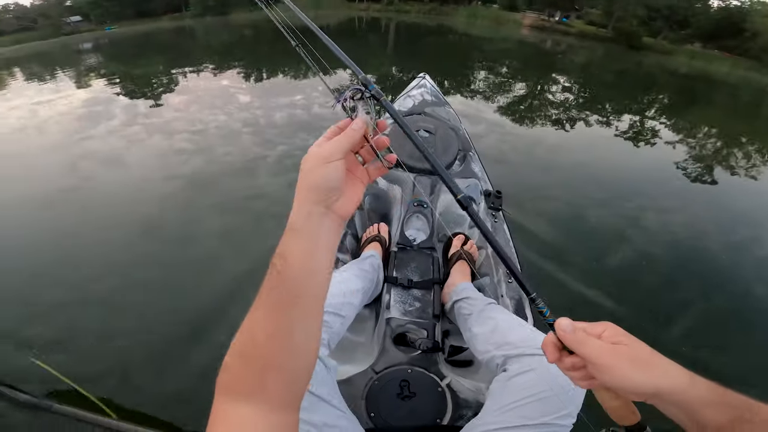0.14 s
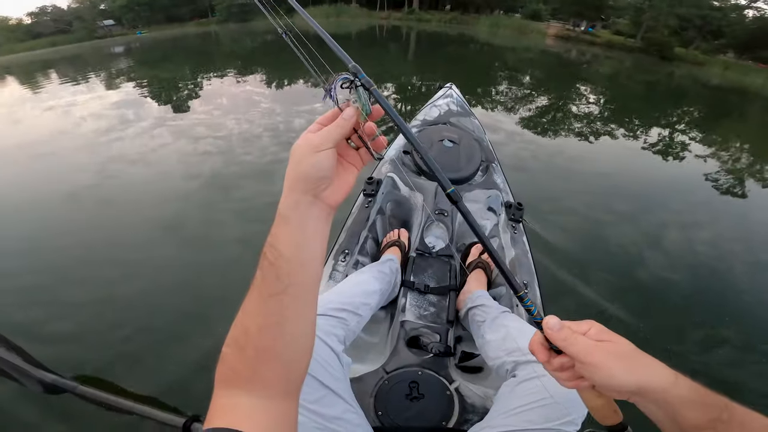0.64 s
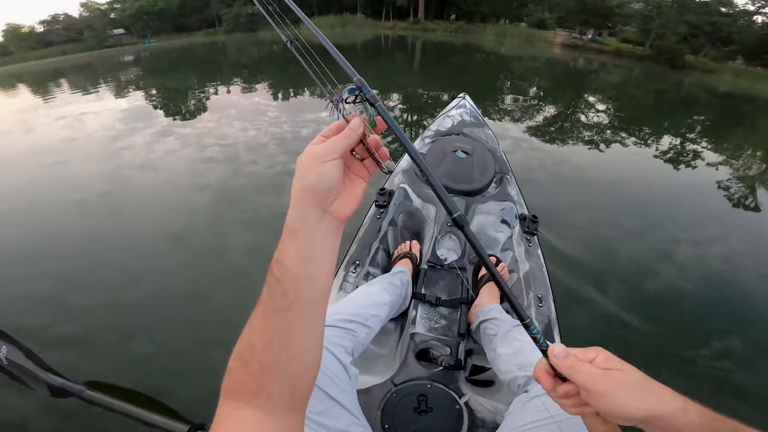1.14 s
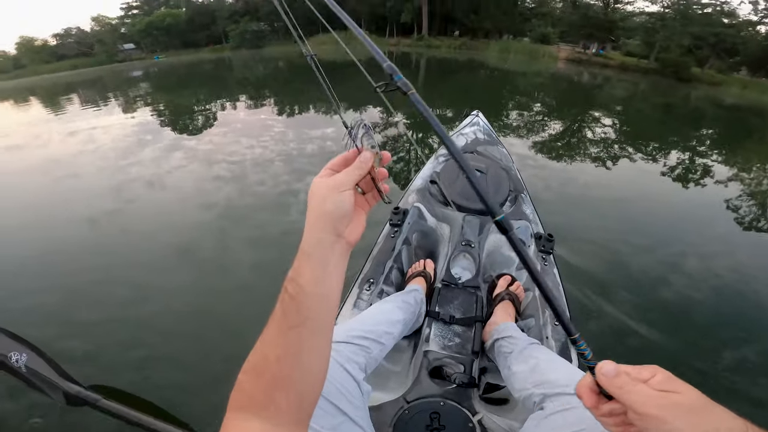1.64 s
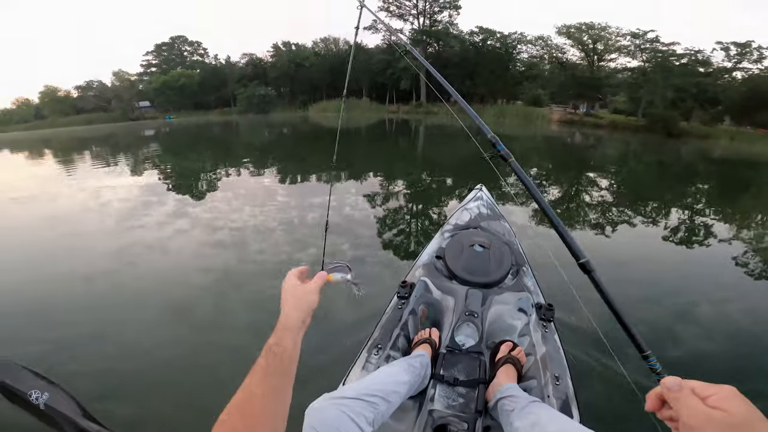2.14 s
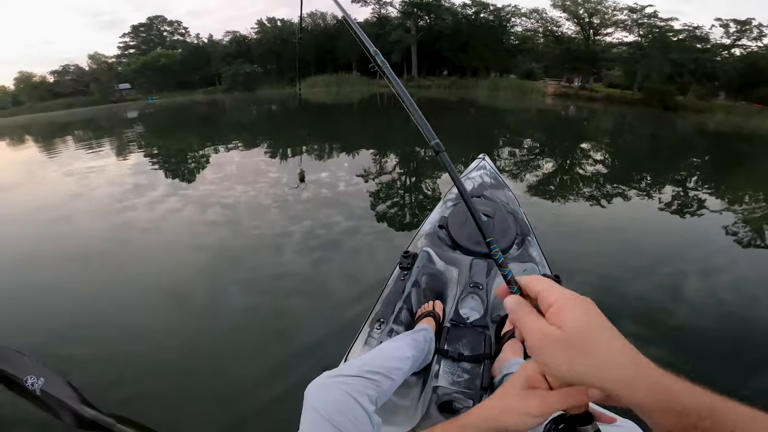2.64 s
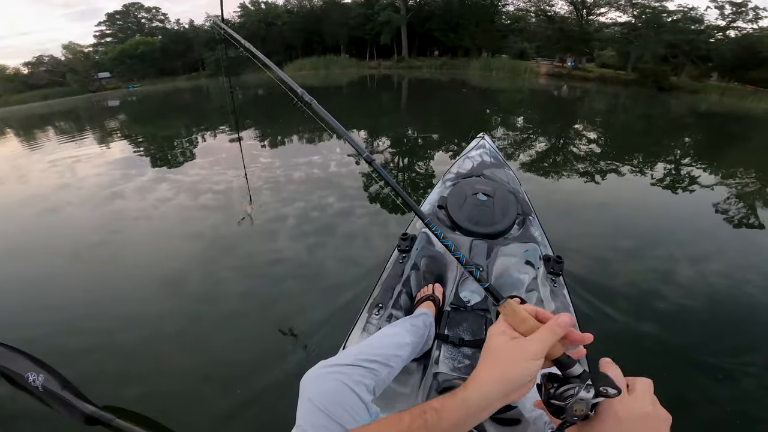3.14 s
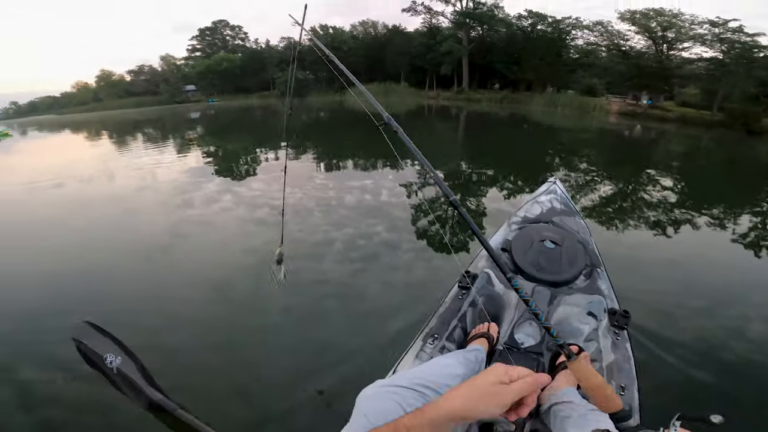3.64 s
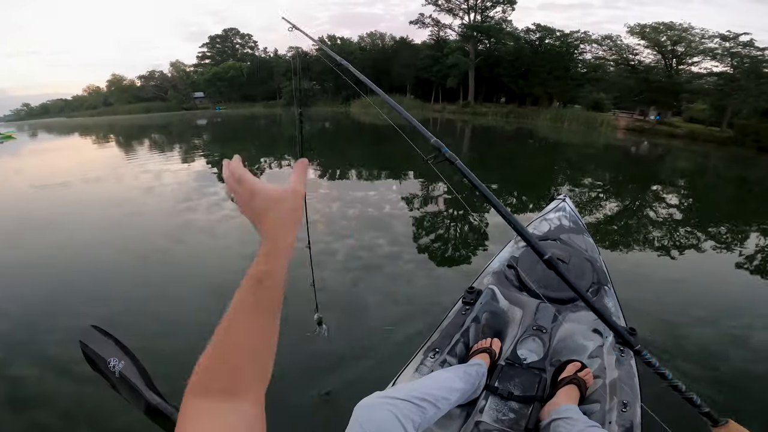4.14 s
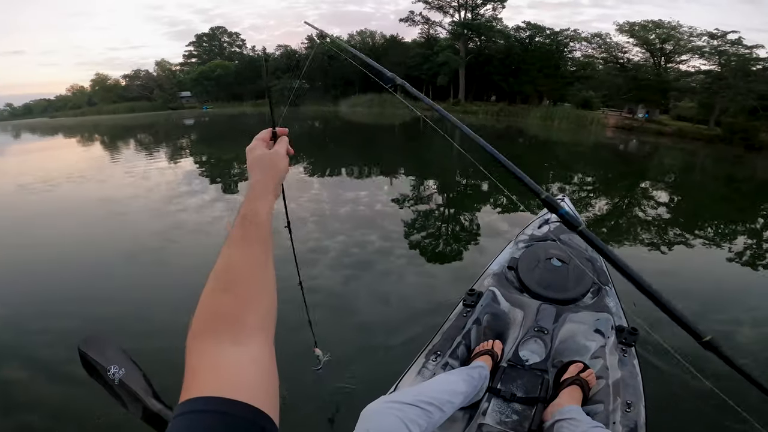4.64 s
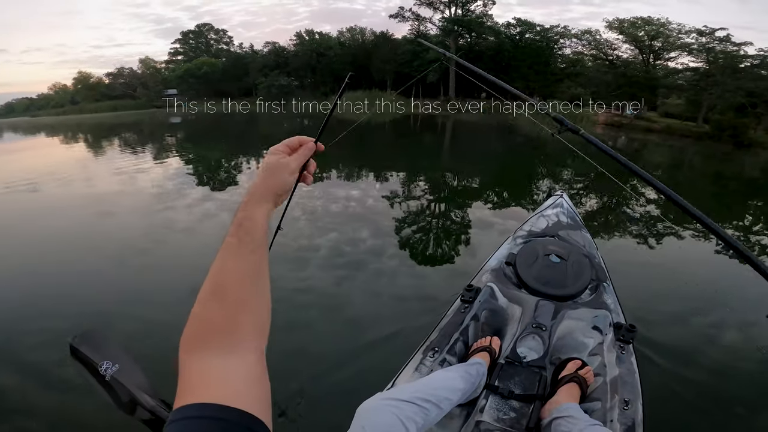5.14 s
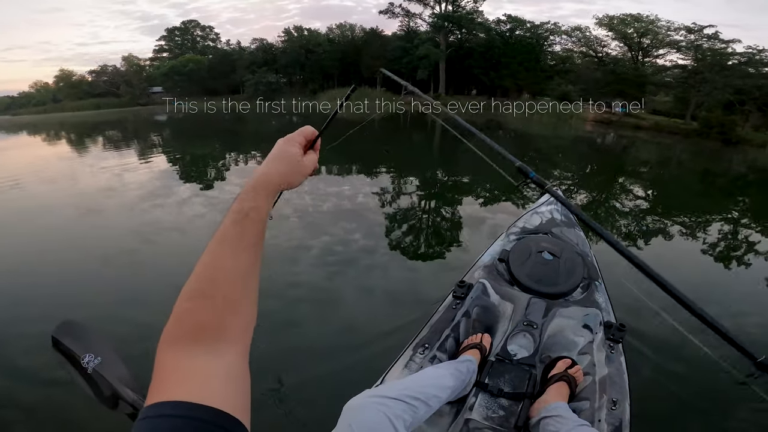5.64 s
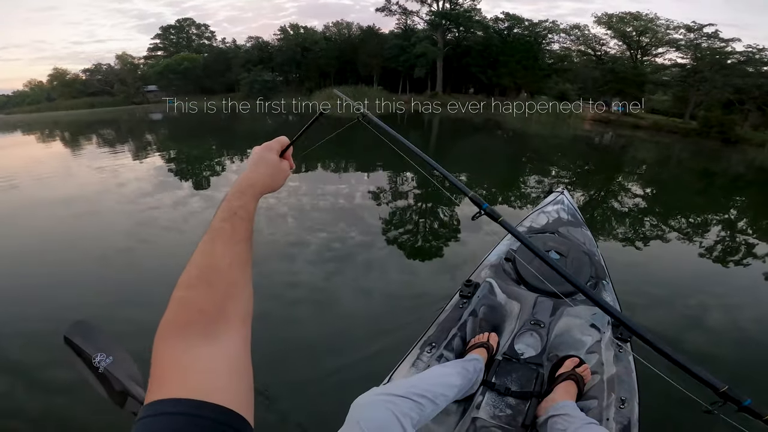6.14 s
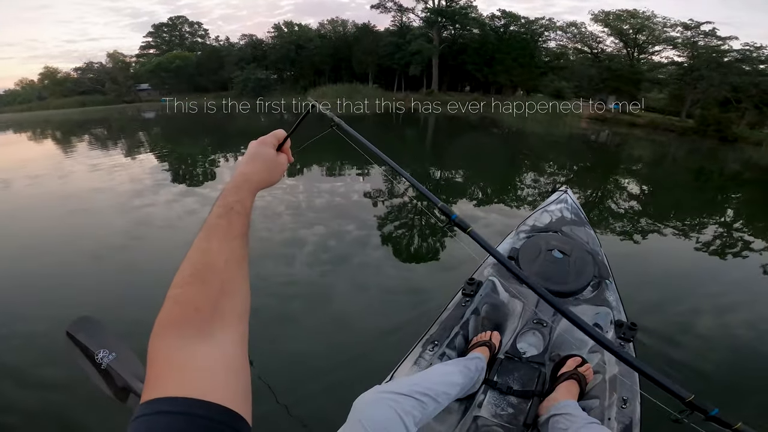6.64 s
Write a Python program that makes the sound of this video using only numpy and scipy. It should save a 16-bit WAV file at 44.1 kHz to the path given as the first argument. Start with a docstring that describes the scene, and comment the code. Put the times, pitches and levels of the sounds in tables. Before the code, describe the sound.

On a still lake at dawn, a soft bassy air bed and a short water swish open the scene. Thin bird chirps echo from the bank. Close to the microphone, hooks and plastic parts click lightly, then rattle sharply in a dense run between about two and three and a half seconds. Birds take over, with one hard snap and small ticks near the end.

```python
"""Fishing tackle at dawn

Dawn on a still lake, heard from a small boat: a hand frees a lure and works a fishing reel.
Hooks and plastic parts click and rattle close by: rough bursts of noise that set small modes ringing.
Birds in the bank trees are gliding sines with noise echoes; an insect is noise pulsed by wing strokes.
Rustles, one water swish at the start, air and a faint whine are shaped noise; a far hum is two low tones."""
import sys
import numpy as np
from scipy import signal
from scipy.fft import rfft, irfft
from scipy.io import wavfile

SR = 44100
rng = np.random.default_rng(int(sys.argv[2]) if len(sys.argv) > 2 else 0)


def volts_from_decibels(level):
    """Turn decibel levels (scalar or array-like) into linear amplitude factors."""
    exponent = np.asarray(level, float) / 20
    return 10 ** exponent


def log_audio(samples):
    """Write samples as a 16-bit WAV file to the path given in sys.argv[1]."""
    # one column per channel
    frames = np.atleast_2d(samples).T
    # limit to full scale, then quantise
    limited = np.clip(frames, -1, 1)
    pcm = np.round(limited * 32767).astype(np.int16)
    wavfile.write(sys.argv[1], SR, pcm)


N = 299439  # length of the scene in samples


def rms_one(x):
    """Scale a sound to rms 1."""
    return x / np.sqrt(np.mean(x ** 2) + 1e-20)


def in_time(rows):
    """Draw straight lines between the rows of a table: one value per sample for each column."""
    s, *columns = np.transpose(rows)
    return [np.interp(np.arange(N) / SR, s, column) for column in columns]


def drift(rate_hz):
    """A smooth random wander of spread 1, made from low-passed noise."""
    step = 40  # worked out at every 40th sample, then joined by lines
    r = np.exp(-2 * step * np.pi * rate_hz / SR)
    slow = signal.lfilter([1], [1, -2 * r, r * r], rng.standard_normal(N // step + 2002))
    slow = slow[2000:]  # skip the filter's start
    slow = rms_one(slow - slow.mean())
    return np.interp(np.arange(N) / step, np.arange(len(slow)), slow)


def band(x, low_hz, high_hz):
    """Butterworth band-pass: keep what lies between two frequencies."""
    edges = [low_hz, min(high_hz, .45 * SR)]
    return signal.sosfilt(signal.butter(2, edges, "band", fs=SR, output="sos"), x)


def around(x, centre_hz, width_hz):
    """Band-pass twice around a centre, for steeper sides."""
    edges = centre_hz - width_hz / 2, centre_hz + width_hz / 2
    return band(band(x, *edges), *edges)


def coloured(spectrum, patchy_db):
    """Noise shaped by a spectrum; each half octave flickers by itself; about rms 1."""
    hz = np.maximum(np.fft.rfftfreq(N, 1 / SR), 1)
    table = np.array(spectrum)
    shape_db = np.interp(np.log(hz), np.log(table[:, 0]), table[:, 1])
    shaped = rfft(rng.standard_normal(N)) * volts_from_decibels(shape_db)
    half_octave = 2 * np.log2(hz / 20)
    total = np.zeros(N)
    for k in range(21):
        part = irfft(shaped * np.clip(1 - abs(half_octave - k), 0, 1), N)
        total += part * volts_from_decibels(patchy_db * drift(8.0))
    return rms_one(total)


def add(out, s, sound):
    """Mix a short sound in at time s."""
    i = round(s * SR)
    out[i:i + len(sound)] += sound[:N - i]


def parabola(u, first, middle, last):
    """A smooth curve through three values, for u from -1 to 1."""
    return middle + (last - first) / 2 * u + ((first + last) / 2 - middle) * u ** 2


def puffs(rows, grain_db):
    """Soft-edged bursts of band noise, the grainier the larger grain_db."""
    out = np.zeros(N)
    for s, length, hz, width_hz, db in rows:
        u = np.linspace(-1, 1, int(length * SR))
        noise = rng.standard_normal(len(u)) * volts_from_decibels(grain_db * drift(150.0)[:len(u)])
        add(out, s, volts_from_decibels(db) * np.sqrt(1 - u ** 2) * rms_one(around(noise, hz, width_hz)))
    return out


# colour of air, far traffic and microphone hiss: (frequency [Hz], relative level per Hz [dB])
AIR_COLOUR = [(20, -4), (86, 2.5), (388, -2), (718, -6), (1030, -12.5), (1600, -20.5), (2600, -25.5),
              (4180, -29.5), (6360, -30), (11800, -41), (12200, -70)]
# loudness of that noise: (time [s], level [dB])
AIR_LOUDNESS = [(0.0, -61), (0.34, -61), (6.79, -62.5)]


def air():
    """Air, far traffic and microphone hiss together: one steady noise, strongest in the bass."""
    return volts_from_decibels(in_time(AIR_LOUDNESS)[0]) * coloured(AIR_COLOUR, patchy_db=0.3)


# far hum, before its wavering: (time [s], lower tone level [dB], upper tone level [dB])
HUM_LEVELS = [(0, -81, -65), (.6, -72.5, -73), (1.0, -63.5, -69.5), (1.5, -76, -63), (2.3, -71.5, -75.5),
              (3.299, -79.5, -80.5), (5.8, -81.5, -82), (6.5, -77, -70.5)]


def hum():
    """Two low tones about an octave apart, wavering in pitch and loudness."""
    out = np.zeros(N)
    for hz, db in zip((129, 258.3), in_time(HUM_LEVELS)):
        wavering_hz = hz * (1 + 0.0067 * drift(3.0))
        tone = np.sqrt(2) * np.sin(2 * np.pi * np.cumsum(wavering_hz) / SR)  # rms 1
        out += volts_from_decibels(db + 1.6 * drift(3.4)) * tone
    return out


def whine():
    """A faint narrow band of noise that swells and sinks slowly."""
    centre_hz, width_hz, level_db = 1960, 200, -84
    narrow = band(rng.standard_normal(N), centre_hz - width_hz / 2, centre_hz + width_hz / 2)
    return volts_from_decibels(level_db + 1.3 * drift(.5)) * rms_one(narrow)


# colour of the water swish: (frequency [Hz], relative level per Hz [dB])
SWISH_COLOUR = [(300, -2.5), (800, 9), (1400, -12), (2200, -6.5), (3200, -12), (4700, 5), (5600, -13),
                (9000, -31.5)]


def swish():
    """Water swishes once at the start: patchy noise that holds briefly, then dies away."""
    level_db, hold_s, fade_db_per_s = -61.5, 0.19, 64
    fading_s = np.maximum(np.arange(N) / SR - hold_s, 0)
    return volts_from_decibels(level_db - fade_db_per_s * fading_s) * coloured(SWISH_COLOUR, patchy_db=4.0)


def insect():
    """Steady wing strokes, each a short rasp into one broad resonance."""
    strokes_per_s, level_db = 74.2, -83.5
    stroke = np.cumsum(strokes_per_s * (1 + .006 * drift(1.5))) / SR
    gate = .25 + (.5 + .5 * np.cos(2 * np.pi * stroke)) ** 2
    rasp = around(rng.standard_normal(N) * gate, centre_hz=5720, width_hz=850)
    return volts_from_decibels(level_db + 1.2 * drift(.6)) * rms_one(rasp)


def whistle(length, first_hz, middle_hz, last_hz, db):
    """A sine gliding along a parabola through three pitches, with soft ends."""
    u = np.linspace(-1, 1, int(length * SR))
    hz = parabola(u, first_hz, middle_hz, last_hz)
    return volts_from_decibels(db) * np.sqrt(2) * (1 - u ** 2) ** 0.5 * np.sin(2 * np.pi * np.cumsum(hz) / SR)


def trees(x, t60):
    """Scattered echoes from bank and foliage: a noise tail that falls by 60 dB in t60 seconds."""
    t = np.arange(int(t60 * SR)) / SR
    tail = rng.standard_normal(len(t)) * volts_from_decibels(-60 * t / t60) * np.minimum(t / 0.011, 1)
    return signal.fftconvolve(x, tail / np.sqrt(np.sum(tail ** 2)))[:N]


def chorus():
    """Many faint chirps from farther trees, at random, more of them later on."""
    out = np.zeros(N)
    for when, length, pitch, bend, slide, level in rng.random((210, 6)):
        hz = 1800 + 2200 * pitch ** 1.5
        glide = hz * (1.07 - .14 * slide), hz * (1 + .06 * bend), hz * (.93 + .14 * slide)
        note = whistle(.015 + .035 * length, *glide, -87 + 8 * level)
        add(out, when ** .5 * (N / SR - .1), note)
    return out


def series():
    """Seven syllables sinking in pitch, each an upward flick into a held tone; the flicks grow quickly at first."""
    start_s, beat_s, top_hz, sag_hz_per_s = 1.788, .0843, 7000, 980
    held_db, flick_limit_db, flick_growth_db = -72, -69.5, 18
    out = np.zeros(N)
    for k in range(7):
        s = start_s + k * beat_s
        hz = top_hz - sag_hz_per_s * k * beat_s
        flick_db = flick_limit_db - flick_growth_db * 0.55 ** k
        add(out, s, whistle(.016, .74 * hz, .87 * hz, .95 * hz, flick_db))
        add(out, s + 0.012, whistle(0.076, .97 * hz, hz, .985 * hz, held_db))
    return out


def cascade():
    """Four steps falling ever faster in pitch, each a short tone with broad breath just above it."""
    start_s, beat_s, top_hz, drop_hz = 5.229, .114, 6230, 200
    tone_db, breath_db, fade_db_per_step = -73.5, -79, 1
    out, breath = np.zeros(N), []
    for k in range(4):
        s = start_s + k * beat_s
        hz = top_hz - drop_hz * k ** 2
        fade_db = fade_db_per_step * k
        add(out, s, whistle(.06, .98 * hz, hz, hz, tone_db - fade_db))
        breath.append((s - .02, .16, 1.12 * hz, .36 * hz, breath_db - fade_db))
    return out + puffs(breath, grain_db=4)


def run_of(first_s, beat_s, repeats, first_db, middle_db, last_db):
    """Entries on a steady beat, their level following a parabola."""
    db = parabola(np.linspace(-1, 1, repeats), first_db, middle_db, last_db)
    return zip(first_s + beat_s * np.arange(repeats), db)


def sing(motif, entries, pitch_spread):
    """Sing a motif at every entry, each note a little off in pitch and level by chance."""
    out = np.zeros(N)
    for s, db in entries:
        for delay, length, *hz, note_db in motif:
            wobble = rng.standard_normal(4)
            pitches = hz * (1 + pitch_spread * wobble[:3])
            add(out, s + delay, whistle(length, *pitches, db + note_db + 1.5 * wobble[3]))
    return out


# three motifs sung again and again on a beat:
# (delay [s], length [s], first pitch [Hz], middle pitch [Hz], last pitch [Hz], relative level [dB])
RISING_MOTIF = [(0, .04, 2430, 2600, 2700, -4), (.033, .03, 2660, 2680, 2690, 0),
                (.055, .03, 2750, 2950, 3060, -4), (.125, .06, 2600, 2700, 2660, -11)]
ARCH_MOTIF = [(0, .065, 1880, 2340, 1880, 0)]
FLICK_MOTIF = [(0, .012, 3000, 3600, 4250, 0)]


def repeated_motifs():
    """Three bird motifs, each repeated on its own steady beat and loudest in mid-run."""
    rising = run_of(4.644, .2535, 7, first_db=-70, middle_db=-65, last_db=-72)
    arches = run_of(2.03, .2515, 10, first_db=-83.5, middle_db=-73, last_db=-75)
    flicks = run_of(2.19, .2535, 9, first_db=-82.5, middle_db=-73.5, last_db=-79)
    runs = (RISING_MOTIF, rising), (ARCH_MOTIF, arches), (FLICK_MOTIF, flicks)
    return sum(sing(motif, entries, pitch_spread=.012) for motif, entries in runs)


# calls given twice, their notes:
# (delay [s], length [s], first pitch [Hz], middle pitch [Hz], last pitch [Hz], relative level [dB])
CHIP_CALL = [(0.0013, 0.024, 7700, 6960, 7300, 0)]
CHATTER_CALL = [(0, 0.035, 2870, 2930, 2940, 0), (.048, 0.0256, 2590, 2290, 2050, 0),
                (.132, .07, 3000, 2770, 2690, 2)]
SLUR_CALL = [(0, .1, 3320, 3630, 4250, 2), (.078, 0.038, 4080, 4230, 4200, -6)]
DRAWL_CALL = [(0, 0.23, 3650, 3725, 3770, 0)]
# when each call is given, before chance and flutter: (time [s], level [dB])
CHIP_TIMES = [(0.411, -69), (6.48, -72.5)]
CHATTER_TIMES = [(0.481, -79.5), (1.09, -79)]
SLUR_TIMES = [(1.238, -78), (1.842, -73.5)]
DRAWL_TIMES = [(3.544, -70), (4.14, -76.5)]


def paired_calls():
    """Four different whistled calls, each given twice."""
    calls = ((CHIP_CALL, CHIP_TIMES), (CHATTER_CALL, CHATTER_TIMES),
             (SLUR_CALL, SLUR_TIMES), (DRAWL_CALL, DRAWL_TIMES))
    return sum(sing(motif, entries, pitch_spread=.004) for motif, entries in calls)


# single gliding notes, before flutter:
# (time [s], length [s], first pitch [Hz], last pitch [Hz], level [dB])
SINGLE_NOTES = [(0.347, 0.063, 3620, 3260, -78.5), (1.005, 0.028, 3450, 3200, -78.5),
                (1.267, 0.058, 2640, 2550, -75), (1.58, 0.041, 2710, 2650, -81),
                (1.638, 0.075, 2950, 2830, -79.5), (1.682, 0.042, 2830, 2180, -72.5),
                (0.57, 0.1, 6950, 6900, -88.5), (1.733, 0.04, 7600, 7900, -81),
                (1.84, .05, 2350, 2250, -77), (1.932, 0.043, 2800, 2600, -84.5),
                (1.76, 0.02, 2540, 2560, -71), (3.759, 0.037, 3150, 2730, -77),
                (3.896, 0.026, 2450, 2810, -75), (4.133, 0.047, 8030, 7890, -66.5),
                (4.323, 0.047, 7560, 7140, -64), (4.352, 0.013, 7200, 4500, -66.5),
                (1.77, 0.036, 7100, 7100, -77), (3.84, 0.052, 4070, 4000, -75),
                (4.375, 0.033, 2550, 2740, -78), (4.501, 0.049, 2530, 2270, -76),
                (6.093, 0.017, 3300, 2650, -74), (6.104, 0.06, 2520, 2335, -76.5),
                (6.234, 0.028, 2280, 2225, -76), (6.434, 0.014, 3280, 2500, -79),
                (6.439, 0.048, 2444, 2370, -75.5)]


def single_notes():
    """Lone whistles, each gliding straight from one pitch to another."""
    out = np.zeros(N)
    for s, length, first_hz, last_hz, db in SINGLE_NOTES:
        add(out, s, whistle(length, first_hz, (first_hz + last_hz) / 2, last_hz, db))
    return out


# breathy far calls, and at 1.95 s a breathy wash beneath the seven-syllable series: (time [s], length [s],
# centre [Hz], width [Hz], level [dB])
HUSKY_CALLS = [(4.47, .14, 7300, 700, -85), (4.62, .11, 7150, 600, -85), (5.53, .1, 7100, 600, -86),
               (1.95, .45, 6100, 1400, -80), (3.88, .28, 6300, 120, -90)]


def birds():
    """Whistles fluttering in level on their way across the water, with echoes, plus breathy far calls and a
    breathy wash under the series."""
    near = single_notes() + paired_calls()
    near = near * volts_from_decibels(2.5 * drift(70.0))
    far = chorus() + series() + cascade() + repeated_motifs()
    far = far * (1 + .45 * drift(120.0))
    echoes = volts_from_decibels(-13) * trees(near, t60=.4) + volts_from_decibels(-4) * trees(far, t60=.45)
    return near + far + echoes + puffs(HUSKY_CALLS, grain_db=3)


# rustles of hand, line and cloth: (time [s], length [s], centre [Hz], width [Hz], level [dB])
RUSTLE_PUFFS = [(1.22, 0.1, 5900, 6900, -76), (1.78, 0.096, 4960, 7900, -79), (2.68, .07, 4950, 2540, -71),
                (2.82, 0.041, 7800, 8000, -67.5), (3.80, 0.033, 5260, 6980, -68),
                (3.843, 0.042, 7100, 5030, -67), (5.795, 0.04, 2860, 4640, -61),
                (5.87, 0.049, 4500, 5000, -71.5), (5.99, 0.013, 7320, 4020, -70),
                (6.07, 0.099, 3530, 4000, -77)]


def rustles():
    """Hand, line and cloth rub: short grainy puffs of noise."""
    return puffs(RUSTLE_PUFFS, grain_db=3)


def ring(clicks, hz, t60):
    """A mode struck by a unit click: a sine that falls by 60 dB in t60 seconds."""
    r, w = volts_from_decibels(-60 / (t60 * SR)), 2 * np.pi * hz / SR
    return signal.lfilter([0, np.sin(w)], [1, -2 * r * np.cos(w), r * r], clicks + 1e-18)


# tackle clicks, levels before the last filters: (time [s], snap peak level [dB],
# knock strength [dB], snap centre [Hz], rebound loss before fading and chance [dB])
TACKLE_CLICKS = [(1.1466, -42.5, -68, 6170, 30), (1.2641, -52, -51, 5800, 11),
                 (1.7863, -55.5, -60.5, 5700, -7), (1.82, -54, -57, 6300, 6), (1.879, -53, -73, 7600, 20),
                 (2.0938, -50, -55.5, 6950, 15), (2.2354, -17.5, -32, 5150, 12.5),
                 (2.2775, -46, -51, 5540, 2), (2.3963, -10.5, -25.5, 6400, 29),
                 (2.4059, -19.5, -27.5, 6270, 11.5), (2.4162, -22.5, -28.5, 5260, 8),
                 (2.4412, -36.5, -50.5, 6740, 9), (2.4869, -10.5, -31.5, 5440, 7),
                 (2.5055, -23, -49, 5350, 5), (2.5323, -44.5, -50.5, 5200, 4), (2.557, -42, -56.5, 5200, 2),
                 (2.619, -49.5, -62, 6400, 13), (2.7387, -49, -55.5, 4360, 12),
                 (2.9188, -17.5, -24, 5450, 25.5), (2.931, -29.5, -30, 5560, 15),
                 (2.9993, -44, -52, 7060, 15), (3.0149, -19.5, -36.5, 5770, 1),
                 (3.026, -23, -40, 5650, 4.5), (3.0472, -44, -53, 5900, 19), (3.0656, -39.5, -50, 5130, 6),
                 (3.0857, -51, -53, 5360, 3), (3.1306, -31.5, -36.5, 5020, 15),
                 (3.221, -14.5, -17.5, 5740, 28), (3.232, -22, -26, 5670, 20),
                 (3.2414, -23, -30.5, 5940, 18), (3.303, -51, -52, 5100, 10),
                 (3.3218, -21.5, -33.5, 5200, 25.5), (3.3446, -24.5, -39, 5360, 23.5),
                 (3.379, -45, -49, 5500, 13), (3.4, -34.5, -41.5, 4870, 14.5),
                 (3.4068, -5, -27.5, 6060, 33), (3.4296, -22.5, -23, 6750, 16),
                 (3.4425, -34.5, -32.5, 6660, 3.5), (3.5176, -21.5, -27, 5600, 17),
                 (3.5287, -32.5, -32, 5400, 7.5), (3.8075, -48.5, -52.5, 6300, 15),
                 (4.5668, -55, -56.5, 5100, 17), (4.89, -50, -52.5, 7500, 9), (5.1352, -51, -57, 6400, 13),
                 (5.7332, -8.5, -31, 6130, 32.5), (5.9734, -38.5, -39, 5300, 20),
                 (6.6225, -30.5, -42, 4880, 32)]


def contacts():
    """Parts bounce: each click has four uneven, mostly fading rebounds (time, snap dB, knock dB, snap Hz)."""
    gap_s, fade_db_per_s, uneven_db, extra_knock_loss_db = 0.0057, 601, 3.5, 0.5
    rows = []
    chance = rng.standard_normal((len(TACKLE_CLICKS), 2, 4))
    for (s, snap_db, knock_db, hz, below_db), luck in zip(TACKLE_CLICKS, chance):
        rows.append((s, snap_db, knock_db, hz))
        late_s = np.cumsum(gap_s * np.exp(0.34 * luck[0]))
        loss_db = below_db + fade_db_per_s * late_s + uneven_db * luck[1]
        for late, loss in zip(late_s, loss_db):
            rows.append((s + late, snap_db - loss, knock_db - loss - extra_knock_loss_db, hz))
    return np.array(rows)


def snaps(rows):
    """A bright snap per contact: a burst of tiny impacts, brighter when harder."""
    brighter_db_per_db = 0.77
    out, t = np.zeros(N), np.arange(1500) / SR
    dying = np.exp(-t / 0.00011) + 0.56 * np.exp(-t / 0.0024)  # impact, then chatter
    for s, snap_db, _, hz in rows:
        loose = rng.random(len(t)) < 400 / SR  # loose parts rattle on, about 400 hits a second
        rattle = 0.36 * np.exp(-t / 0.0037) * loose
        push = rng.standard_normal(len(t)) * (dying + rattle)
        body = band(band(push, 0.77 * hz, 1.253 * hz), 0.41 * hz, 2.21 * hz)
        brightness = 0.089 * volts_from_decibels(brighter_db_per_db * (snap_db + 19))
        snap = body + brightness * band(push, 2800, 12500)
        add(out, s, volts_from_decibels(snap_db) * snap / abs(snap).max())
    return out


# ways the plastic shell rings, briefly: (frequency [Hz], relative level [dB], time to fall 60 dB [s])
SHELL_MODES = [(518, -15.5, 0.065), (707.3, -4.5, 0.013), (1053, -10.5, 0.033), (1414, -8, .02),
               (1800, -4.5, 0.021), (2275, 2.5, 0.014), (2830, -2, 0.013)]
# ways the thin steel parts ring: (frequency [Hz], relative level [dB], time to fall 60 dB [s])
STEEL_MODES = [(1640, -30, .07), (3004, -30, .06), (3537, -31, .08), (4000, -28, .08), (4495, -30, .05),
               (5120, -27, .06), (5712, -29, .05), (6331, -28, .045), (7600, -33, .05), (13900, -27, .014)]


def knocks(rows):
    """A hollow shell knock and a thin steel ring per contact: rough pushes set the modes ringing."""
    out, at = np.zeros(N), (rows[:, 0] * SR).astype(int)
    spread = np.exp(-1 / (SR * 0.0022))  # a contact is no single instant but a short rough push
    for modes, offset_db in (SHELL_MODES, -7.6), (STEEL_MODES, 0.5):
        for hz, db, t60 in modes:
            luck_db = 4 * rng.standard_normal(len(rows))  # every blow favours other modes
            blows = np.full(N, 1e-18)
            blows[at] = volts_from_decibels(rows[:, 2] + offset_db + db + luck_db)
            push = signal.lfilter([np.sqrt(1 - spread ** 2)], [1, -spread], blows)
            out += ring(push * rng.standard_normal(N), hz, t60)
    return out


def tackle():
    """Hooks and plastic parts touch: each contact is a snap, a hollow knock and a thin steel ring."""
    rows = contacts()
    out = snaps(rows) + knocks(rows)
    # small parts push no bass
    thin = signal.sosfilt(signal.butter(4, 430, "high", fs=SR, output="sos"), out)
    return signal.sosfilt(signal.butter(3, 11500, fs=SR, output="sos"), thin)


def scene():
    """Everything meets at one point, the same on both sides."""
    background = air() + hum() + whine() + swish()
    animals = insect() + birds()
    handling = rustles() + tackle()
    return np.tile(background + animals + handling, (2, 1))


def band_limit(x):
    """A steep low-pass at the top of the band."""
    return signal.sosfilt(signal.butter(12, 16530, fs=SR, output="sos"), x)


def record(dry):
    """The two sides are set apart by a faint hiss and a faint flicker, opposite on each side."""
    hiss = signal.sosfilt(signal.butter(10, 11900, fs=SR, output="sos"), rng.standard_normal(N))
    flicker = volts_from_decibels(-37.5) * drift(200.0) * dry[0]
    apart = volts_from_decibels(-86.0) * hiss + flicker
    mix = dry + apart * [[1], [-1]]
    return band_limit(mix)


dry = scene()
out = record(dry)
log_audio(out)
```